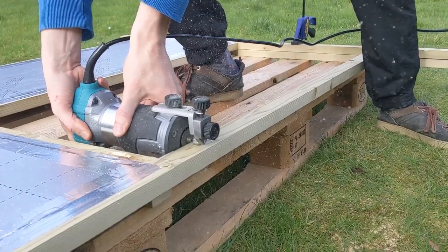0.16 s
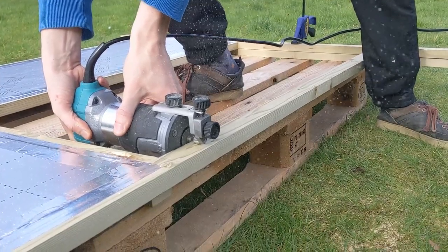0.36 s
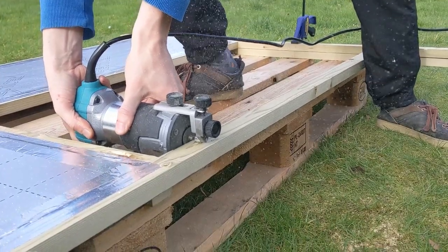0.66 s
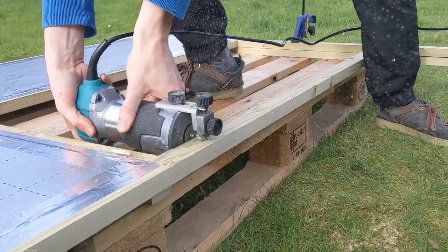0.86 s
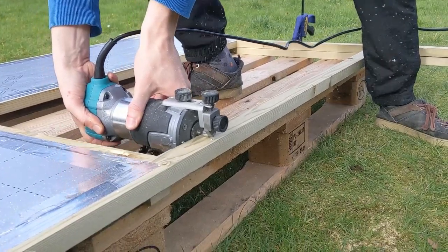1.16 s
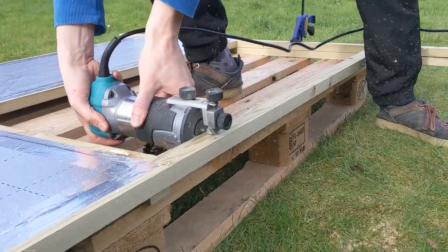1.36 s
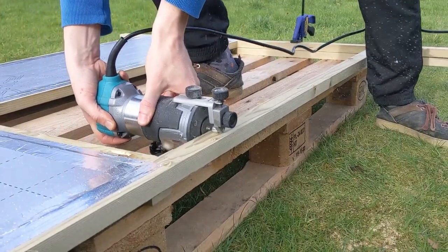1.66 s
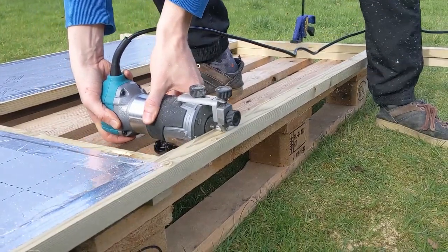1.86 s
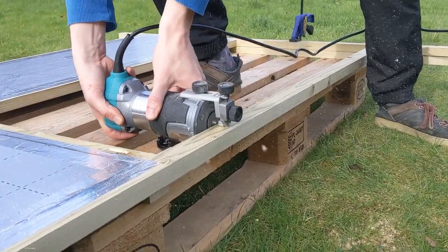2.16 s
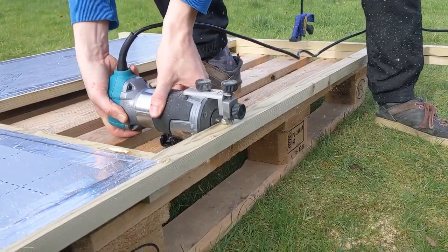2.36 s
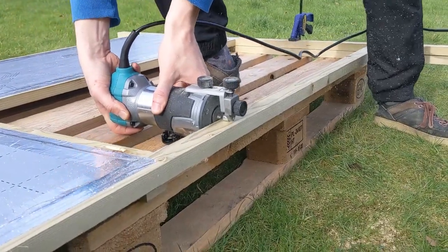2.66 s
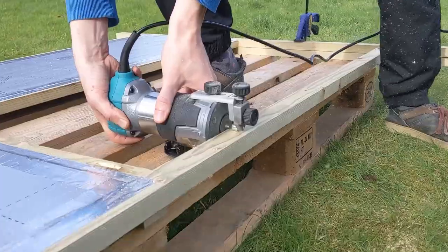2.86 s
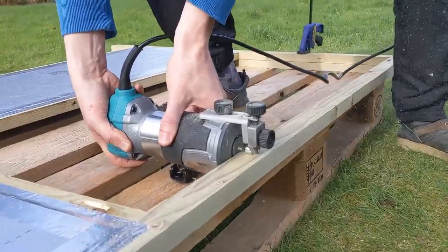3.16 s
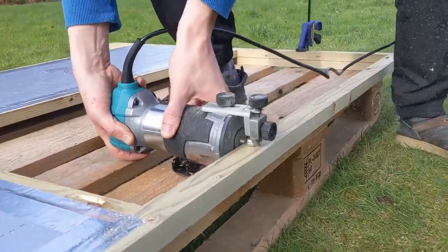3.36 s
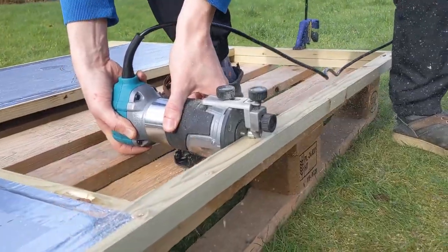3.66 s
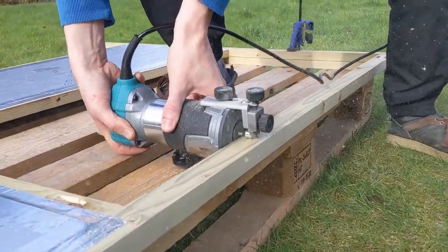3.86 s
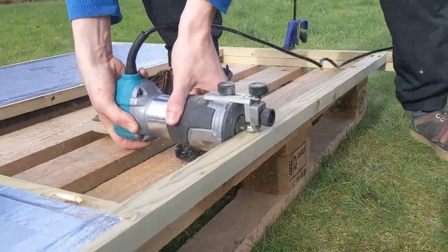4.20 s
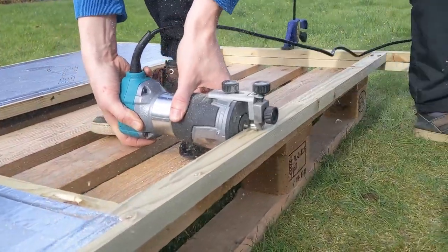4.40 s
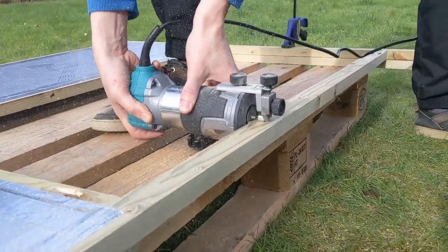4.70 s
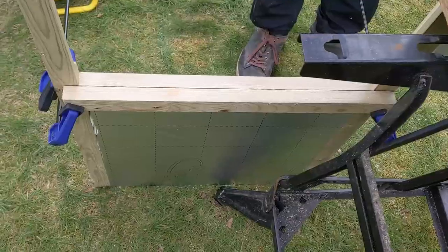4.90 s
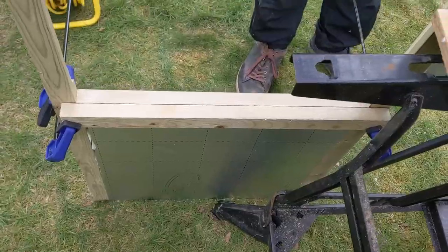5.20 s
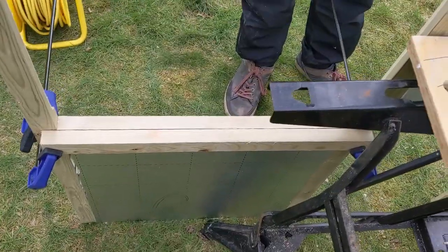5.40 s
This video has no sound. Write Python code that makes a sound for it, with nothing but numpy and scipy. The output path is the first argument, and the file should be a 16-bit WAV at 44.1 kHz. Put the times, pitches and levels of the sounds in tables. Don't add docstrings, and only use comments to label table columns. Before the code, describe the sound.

A handheld wood router, already at full speed, drones and whines close to a small stereo camera, with airy, chattering chip noise. Its stereo image and tone change abruptly just before one second, then individual harmonics flare and fade. Near the end the cutting roughens, then a hard edit leaves a quiet grassy place with low wind thumps, faint far traffic hiss, tiny clicks and one brief shoe scuff.

```python
import sys
import numpy as np
from scipy import signal
from scipy.fft import rfft, irfft
from scipy.io import wavfile

SR = 44100
rng = np.random.default_rng(int(sys.argv[2]) if len(sys.argv) > 2 else 0)


def volts_from_decibels(level):
    exponent = np.asarray(level, float) / 20
    return 10 ** exponent


def dump(signal):
    limited = np.clip(np.atleast_2d(signal).T, -1, 1)
    pcm = np.round(limited * 32767).astype(np.int16)
    wavfile.write(sys.argv[1], SR, pcm)


N = 244314
T = np.arange(N) / SR
HZ = np.maximum(np.fft.rfftfreq(N, 1 / SR), 1)

BALL_PASS, BALL_SIDEBAND = 4.575, 1.425
STRONG_ORDERS = (BALL_SIDEBAND, 3, 4, BALL_PASS, 5, 6, 7, *range(8, 40, 2))


def rms_one(x):
    return x / np.sqrt(np.mean(x ** 2) + 1e-20)


def in_time(rows):
    s, *columns = np.transpose(rows)
    return np.array([np.interp(T, s, column) for column in columns])


def at_hz(points):
    hz, value = np.array(points).T[:2]
    return np.interp(np.log(HZ), np.log(hz), value)


def step(at_s, fade_s):
    return np.clip((T - at_s) / max(fade_s, 1 / SR) + .5, 0, 1)


def panned(pan_db):
    return volts_from_decibels(np.array([pan_db / 2, -pan_db / 2]))


def filtered(x, order, hz, kind):
    return signal.sosfilt(signal.butter(order, hz, kind, fs=SR, output="sos"), x)


def bell(at_s, length_s, t=T):
    return np.exp(-4 * np.log(2) * ((t - at_s) / length_s) ** 2)


def swells(rows, resting_db):
    out = volts_from_decibels(resting_db) * np.ones((2, N))
    for s, length_s, *side_db in rows:
        near = slice(max(int((s - 2 * length_s) * SR), 0), int((s + 2 * length_s) * SR))
        out[:, near] += np.outer(volts_from_decibels(np.array(side_db)), bell(s, length_s, T[near]))
    return out


def drift(rate_hz, count):
    hop = 64
    settle = 1000
    pole = np.exp(-2 * np.pi * hop * rate_hz / SR)
    coarse = rng.standard_normal((count, N // hop + settle + 2))
    slow = signal.lfilter([1], [1, -2 * pole, pole * pole], coarse)[:, settle:]
    slow = slow / slow.std(axis=1, keepdims=True)
    return np.array([np.interp(np.arange(N) / hop, np.arange(len(row)), row) for row in slow])


def stereo_noise(spectrum_db, likeness, excite, lag_s=0):
    mid, side = rfft(excite)
    alike = np.clip(likeness, -1, 1)
    shared = np.sqrt(1 + alike) * mid
    opposed = np.sqrt(1 - alike) * side
    left = (shared + opposed) * np.exp(2j * np.pi * HZ * lag_s)
    right = shared - opposed
    return rms_one(irfft(volts_from_decibels(spectrum_db) * np.array([left, right]), N))


def patchy(x, shared_db, own_db):
    spectrum = rfft(x)
    together = drift(12.0, count=1)[0]
    own = drift(41, count=9)
    octave = np.clip(np.log2(HZ / 60), 0, 8)
    out = 0
    for k in range(9):
        band = irfft(spectrum * np.clip(1 - abs(octave - k), 0, 1), N)
        out = out + volts_from_decibels(shared_db * together + own_db * own[k]) * band
    return out


def tone(angle, level_db, lead, wander, rate_hz):
    a, b, c, d = drift(rate_hz, count=4)
    share = np.clip(wander, 0, 1)
    path = np.sqrt(1 - share) + np.sqrt(share / 2) * np.array([a + 1j * b, c + 1j * d])
    angle = angle + 2 * np.pi * rng.random()
    return np.sqrt(2) * volts_from_decibels(level_db) * np.real(path * np.exp(1j * np.array([angle + lead, angle])))


def roaming_tone(angle, swapped, per_turn, level_db, wander):
    first_lead = min(.25 * per_turn, 2.3)
    second_lead = .065 * per_turn * drift(1.6, count=1)[0]
    lead = (1 - swapped) * first_lead + swapped * second_lead
    return tone(per_turn * angle, level_db, lead, wander, rate_hz=8 + .22 * per_turn)


def by_pair(levels, swapped):
    return np.outer(levels[:2], 1 - swapped) + np.outer(levels[2:], swapped)


def far_traffic():
    # (time [s], level [dB], left-right [dB])
    hiss_course = [(4.78, -63.5, -4.5), (5.0, -67, -3.5), (5.1, -64, -2.5), (5.27, -68.5, -1),
                   (5.35, -64.5, 0), (5.54, -67.5, -0.5)]
    # (frequency [Hz], density [dB per Hz])
    hiss_colour = [(250, -0.5), (450, -7.5), (700, -7), (1000, -4.5), (1400, -10.5), (1900, -8),
                   (3000, -18), (5000, -25), (7000, -33), (11000, -26.5), (15800, -31)]
    level_db, pan_db = in_time(hiss_course)
    hiss = stereo_noise(at_hz(hiss_colour), -.1, rng.standard_normal((2, N)))
    hiss = patchy(hiss, shared_db=1.0, own_db=1.2)
    airy = filtered(hiss, 2, 4000, "high")
    return (volts_from_decibels(level_db + 9.0) * (hiss - airy) + volts_from_decibels(-57) * airy) * panned(pan_db)


def ticks():
    # (time [s], peak [dB], left-right [dB])
    tick_events = [
        (4.828, -67, 4),
        (5.12, -57, -9),
        (5.241, -54, -9),
    ]
    bright = filtered(rng.standard_normal(N), 2, 3800, "high")
    out = np.zeros((2, N))
    for s, peak_db, side_db in tick_events:
        decay = volts_from_decibels(peak_db - 60 * np.maximum(T - s, 0) / .012) * (T >= s)
        out += decay * bright * panned(side_db)[:, None]
    return out


def scuff():
    # (time [s], level [dB])
    scuff_course = [
        (5.15, -76),
        (5.16, -64),
        (5.2, -62),
        (5.21, -93),
    ]
    noise = filtered(rng.standard_normal((2, N)), 3, [2500, 5800], "band")
    return volts_from_decibels(in_time(scuff_course)[0]) * rms_one(noise) * panned(-2.7)[:, None]


def wind(changed):
    # (time [s], length [s], left [dB], right [dB])
    router_gusts = [
        (.5, 0.96, -59, -63),
        (1.0, 0.41, -64, -60.5),
        (1.8, 0.92, -73, -74),
        (3.2, .4, -80, -76),
        (4.05, 0.61, -76, -75),
        (4.74, 0.17, -66, -67),
    ]
    # (time [s], length [s], left [dB], right [dB])
    field_gusts = [
        (4.78, 0.037, -49.5, -65),
        (4.87, 0.018, -54, -51),
        (5.01, 0.041, -54, -44),
        (5.06, 0.048, -48, -60),
        (5.11, 0.042, -56, -44),
        (5.16, 0.038, -52, -60),
        (5.2, 0.023, -59, -32),
        (5.26, 0.036, -58, -32.5),
        (5.32, 0.054, -44, -40),
        (5.54, 0.019, -62, -45),
    ]
    # (frequency [Hz], density [dB per Hz])
    wind_colour = [(18, -8), (45, 0), (70, -6), (110, -15), (170, -21), (300, -33), (600, -58),
                   (2000, -100)]
    router_gain = swells(router_gusts, resting_db=-83.5)
    field_gain = swells(field_gusts, resting_db=np.array([[-50], [-49]]))
    lumps = volts_from_decibels(2.4 * drift(12, count=2))
    turbulence = stereo_noise(at_hz(wind_colour), .25, rng.standard_normal((2, N)))
    return ((1 - changed) * router_gain + changed * field_gain) * rms_one(lumps * turbulence)


def shaft_angle():
    # (time [s], speed [turns per s])
    speed = [(0, 412.3), (0.47, 415.4), (0.87, 409.1), (1.09, 393.5), (1.13, 393.5), (1.19, 401.8),
             (1.49, 397.4), (1.57, 400.3), (1.69, 399.1), (1.75, 401.4), (1.91, 398.3), (2.01, 403.6),
             (2.05, 403.6), (2.17, 402.9), (2.25, 398.4), (2.29, 398.4), (2.45, 400.2), (2.61, 405.7),
             (2.91, 405.7), (3.21, 394.3), (3.57, 394.6), (3.63, 391.8), (3.71, 391.9), (3.77, 396.7),
             (3.81, 396.7), (3.95, 394.5), (4.01, 391.6), (4.21, 392.3), (4.25, 396.7), (4.37, 400.3),
             (4.45, 395.4), (4.63, 394.8), (4.67, 391.6), (4.76, 390.7)]
    tremble = .25 * drift(25, count=1)[0] + .4 * drift(7, count=1)[0]
    return 2 * np.pi * np.cumsum(in_time(speed)[0] + tremble) / SR


def jolts():
    # (time [s], level [dB])
    jolt_events = [(1.1, -77), (1.83, -71), (3.47, -65.5), (3.77, -61.5), (3.95, -65), (4.05, -62.5),
                   (4.12, -68), (4.22, -63), (4.29, -70), (4.5, -67), (4.7, -78.5)]
    return swells([(s, 0.067, db, db) for s, db in jolt_events], resting_db=-77.5)


def catches():
    # (time [s], length [s], change [dB])
    catch_events = [(0.997, .12, 2.5), (1.46, 0.042, 0.5), (1.79, .05, -3), (1.998, .06, -1),
                    (2.63, 0.07, 0.5), (3.62, 0.045, 0.5), (3.92, 0.067, 1), (4.194, 0.063, 3.5),
                    (4.307, .05, -3.5), (4.347, 0.044, 3.5), (4.48, 0.045, -0.5), (4.53, .04, 3),
                    (4.63, 0.029, 8), (4.72, .08, 1)]
    return sum(db * bell(s, length_s) for s, length_s, db in catch_events)


def cutting_noise(angle, swapped):
    # (time [s], level [dB], left-right [dB])
    noise_course = [(0.0, -35, 1.5), (0.62, -34.5, 1), (0.82, -35.5, 1), (1.74, -37, 0.5), (3.11, -36, 0.5),
                    (3.35, -35, 1.5), (3.6, -36, 2), (4.44, -36, 1.5), (4.76, -35.5, 1.5)]
    # (frequency [Hz], density [dB per Hz])
    first_colour = [(60, -90), (120, -85.5), (300, -84.5), (480, -82), (620, -76), (850, -75), (1400, -83),
                    (1800, -77.5), (2400, -81.5), (3500, -75), (5300, -82.5), (7350, -93.5), (10500, -83.5),
                    (15500, -86)]
    second_colour = [(50, -104), (110, -90), (260, -92.5), (490, -91), (600, -77), (720, -77),
                     (1450, -82.5), (1900, -77), (2300, -80.5), (3600, -78.5), (5400, -85.5), (7300, -92.5),
                     (9800, -87), (15500, -88.5)]
    # (frequency [Hz], width [Hz], gain [dB])
    resonances = [
        (1675, 340, 8.5),
        (2094, 36, 6.5),
        (2712, 260, 8),
        (3144, 140, 4.5),
        (5110, 250, 4.5),
    ]
    # (frequency [Hz], correlation [-1 to 1])
    first_likeness = [(100, 1), (600, 0.75), (1000, 1), (2000, 0.91), (4500, 0.56), (10000, 0.073)]
    second_likeness = [(100, -0.87), (300, -0.6), (600, -0.13), (1000, -0.29), (3000, -0.16),
                       (10000, -0.13)]

    puffs = volts_from_decibels(1.2 * np.cos(angle) + 1.6 * np.cos(2 * angle + 1.2))
    chips = volts_from_decibels(2.0 * np.minimum(rng.exponential(1, (2, 2, N)), 4.5))
    excite = puffs * chips * rng.standard_normal((2, 2, N))
    body_db = sum(db / (1 + (2 * (HZ - hz) / width) ** 2) for hz, width, db in resonances)
    first = stereo_noise(at_hz(first_colour) + 1.44 * body_db, at_hz(first_likeness), excite[0], lag_s=4 / SR)
    second = stereo_noise(at_hz(second_colour) + body_db, at_hz(second_likeness), excite[1])
    both = volts_from_decibels(-1.6) * (1 - swapped) * first + volts_from_decibels(-2.5) * swapped * second
    both = patchy(both, shared_db=.7, own_db=1.7)

    treble = filtered(both, 4, 7000, "high")
    lower = filtered(both, 4, 7000, "low")
    rumble = filtered(both, 4, 330, "low")
    lower += (volts_from_decibels(-4 * swapped) + volts_from_decibels(71.5) * jolts() - 1) * rumble
    bite_db = 3 * bell(.87, .16)
    treble_db = 1.8 + bite_db + 0.48 * catches() + 1.3 * drift(29, count=1)[0]
    treble = treble * volts_from_decibels(treble_db) * panned(-2.5)[:, None]
    level_db, pan_db = in_time(noise_course)
    return volts_from_decibels(level_db) * (lower + treble) * panned(pan_db)


def order_gain(per_turn, swapped):
    # (first pair left [dB], first right [dB], second pair left [dB], second right [dB])
    resting = [(-66, -60, -73, -75.5), (-72, -58, -51, -52), (-46, -49.5, -54.5, -56),
               (-55, -48, -49, -52.5), (-67, -58, -60, -55), (-56.0, -61, -55.5, -71),
               (-69, -55.0, -64.5, -57), (-57, -59, -57.5, -55.5), (-66, -48, -59.5, -56),
               (-76.5, -55, -57, -56.5), (-57, -63.0, -58.5, -69), (-54, -50.5, -62, -65.5),
               (-61, -70, -66.5, -75), (-67.5, -63, -63.5, -68), (-61, -65, -59.5, -65.5),
               (-58, -69, -60, -64.5), (-59, -49.5, -58, -58.5), (-59.0, -59.0, -63, -61),
               (-63, -51, -64, -54), (-59, -60.5, -67, -56), (-64, -62.0, -70, -61), (-62, -61, -67, -54),
               (-76.5, -76.5, -74, -63)]
    # (time [s], order [per turn], length [s], left [dB], right [dB])
    order_flares = [(0.073, 3, 0.27, -51, -57), (0.307, 4, 0.1, -48, -47), (0.51, 3, 0.18, -68.0, -54),
                    (0.55, 4, 0.1, -46, -54), (0.79, 3, 0.46, -53.5, -79), (0.83, 4, 0.59, -56, -50.5),
                    (1.17, 1.425, 1, -61, -72.0), (1.372, 3, 0.4, -51, -48.0), (1.677, 4, 0.065, -52, -56),
                    (1.82, 3, 0.05, -53, -52), (1.91, 4, 0.25, -62, -69), (2.19, 3, 0.17, -54.0, -51),
                    (2.31, 4, 0.18, -51.5, -69), (2.73, 4, 1, -59.5, -59), (2.983, 4, 0.16, -42, -61.5),
                    (3.45, 3, 0.99, -59, -51), (3.593, 1.425, 0.83, -57, -67.5),
                    (3.695, 4, 0.047, -46.5, -76.5), (4.07, 3, 0.36, -49.5, -76.5),
                    (4.09, 4, 0.22, -47, -76.5), (4.696, 3, 0.14, -49, -76.5),
                    (4.717, 4, 0.19, -39.5, -76.5), (4.73, 1.425, 1, -51, -65),
                    (0.03, 8, 0.16, -58, -57), (0.13, 10, 0.36, -61, -58), (0.23, 6, 0.55, -49, -47.5),
                   (0.41, 8, 0.25, -58, -76.5), (0.53, 10, 0.29, -76.5, -51.5),
                   (0.774, 8, 0.31, -76.5, -50), (1.075, 6, 0.11, -46, -39), (1.252, 8, 0.1, -64, -54),
                   (1.48, 6, 0.52, -63, -46.5), (1.776, 8, 0.1, -53, -58), (2.07, 8, 0.19, -47, -65),
                   (2.232, 10, 0.84, -76.5, -53.5), (2.337, 6, 0.3, -66, -55), (2.71, 8, 0.43, -44.5, -54),
                   (3.04, 8, 0.055, -76.5, -51), (3.04, 10, 1, -60, -50), (3.27, 6, 0.53, -47.5, -76.5),
                   (3.7, 8, 0.089, -52, -42), (3.77, 8, 0.75, -47, -51.5), (3.907, 10, 0.44, -48, -76.5),
                   (3.98, 8, 0.21, -80, -46), (4.05, 6, 0.22, -50, -76.5), (4.357, 8, 0.1, -50.5, -66.5),
                   (4.67, 10, 0.49, -55, -66.0), (4.71, 6, 0.4, -76.5, -49.5),
                    (0.07, 22, 0.4, -53, -78), (0.17, 12, 0.9, -55, -67.5), (0.39, 24, 0.16, -54.5, -76.5),
                  (0.75, 20, 0.36, -51, -68.5), (0.81, 18, 0.6, -61.0, -67.5), (0.81, 24, 0.082, -53, -56),
                  (0.85, 16, 0.9, -66, -76.5), (0.85, 22, 0.23, -50, -57.0), (1.035, 24, 0.079, -44.5, -60),
                  (1.188, 14, 0.78, -50.5, -70), (1.81, 24, 0.93, -48, -52), (2.106, 22, 0.087, -61, -59),
                  (2.376, 24, 0.24, -49, -76.5), (2.45, 14, 0.53, -50.0, -68), (2.53, 12, 0.67, -67, -56.5),
                  (2.633, 22, 0.96, -51, -68), (2.91, 20, 0.2, -51.5, -76.5), (3.27, 18, 0.97, -75, -66.0),
                  (3.294, 24, 0.5, -46, -64), (3.51, 16, 1, -61, -78), (3.53, 12, 0.6, -62, -79),
                  (3.75, 22, 0.6, -61, -62), (3.853, 20, 0.21, -57, -59.0), (3.975, 14, 0.089, -52, -57),
                  (4.215, 14, 0.9, -47, -62), (4.27, 12, 0.77, -59, -53.5), (4.61, 12, 0.066, -56, -76.5),
                  (4.718, 18, 0.1, -76.5, -54.0),
                    (0.03, 5, 0.37, -53, -73.5), (0.51, 7, 0.4, -61, -65.5), (0.83, 4.575, 0.4, -47, -52),
                    (0.85, 5, 0.25, -47, -64.0), (1.03, 7, 0.06, -57.5, -55.0), (1.29, 5, 0.16, -52, -76.5),
                    (1.61, 5, 0.6, -66, -71.5), (1.857, 5, 0.092, -60, -48),
                    (2.047, 4.575, 0.084, -57.0, -50), (2.09, 7, 0.9, -76.5, -64.5),
                    (2.33, 4.575, 0.076, -46, -67.5), (2.97, 4.575, 0.9, -51, -50),
                    (3.09, 7, 0.9, -62, -76.5), (3.51, 5, 0.97, -54, -62.0), (3.872, 4.575, 0.1, -45, -53),
                    (4.135, 5, 0.06, -52.0, -51), (4.43, 4.575, 0.61, -51, -62),
                    (4.453, 7, 0.06, -54.0, -52.0), (4.513, 5, 0.25, -63, -49),
                    (4.59, 7, 0.9, -61.5, -55.5), (4.61, 4.575, 0.076, -48, -47),
                    (0.11, 38, 0.16, -61.5, -49.0), (0.233, 30, 0.25, -50.0, -51.0),
                  (0.367, 26, 0.06, -55.0, -55), (0.51, 34, 0.4, -75.0, -61), (0.71, 38, 0.25, -58.0, -47),
                  (0.85, 32, 0.4, -56, -52), (0.93, 28, 0.9, -61.5, -65.0), (0.936, 30, 0.06, -61.5, -42),
                  (1.01, 30, 0.28, -50, -59), (1.19, 26, 0.9, -53, -62), (1.45, 32, 0.055, -56.5, -54.0),
                  (1.45, 38, 0.25, -76.5, -57), (1.59, 34, 0.4, -61, -63), (1.79, 32, 0.6, -57.0, -76.5),
                  (2.39, 38, 0.1, -76.5, -49.5), (2.51, 38, 0.9, -61.0, -65.5), (2.57, 36, 0.71, -52, -70),
                  (2.59, 30, 0.6, -70, -64), (2.63, 34, 0.06, -76.5, -47.5), (2.83, 34, 0.9, -64, -54),
                  (2.85, 26, 0.81, -65, -56), (2.89, 28, 0.72, -63.5, -70.0), (2.93, 28, 0.06, -76.5, -46),
                  (3.85, 32, 0.9, -65, -61.0), (3.93, 34, 0.4, -72, -57.0), (3.99, 28, 1, -80, -60),
                  (4.09, 26, 0.21, -65, -63), (4.09, 36, 0.9, -68.5, -63.5), (4.175, 28, 0.051, -55.0, -47),
                  (4.17, 36, 0.06, -78, -50.5), (4.23, 30, 0.4, -67, -66), (4.61, 34, 0.16, -60.5, -56)]
    flares = np.array(order_flares)
    k = STRONG_ORDERS.index(per_turn)
    owner = abs(flares[:, 1:2] - STRONG_ORDERS).argmin(axis=1)
    own_flares = flares[owner == k][:, [0, 2, 3, 4]]
    return swells(own_flares, by_pair(resting[k], swapped))


def faint_orders(angle, swapped):
    orders = (2.575, 5.575, 7.575, 9, 11, 13, 29, 40, 4.08, 5.07, 6.07, 6.93)
    # (first pair left [dB], first right [dB], second pair left [dB], second right [dB])
    lone_levels = [(-62, -63, -61, -68), (-66, -62, -59, -57), (-50, -64, -60, -61), (-59, -66, -58, -58),
                   (-58, -62, -60, -72), (-68, -62, -57, -61), (-59, -58, -67, -64)]
    top_and_side_levels = [(-80, -80, -72, -51), (-53, -71, -62.5, -57.5), (-78, -66, -65, -57),
                           (-55, -54, -75, -90), (-66, -57, -55.5, -63)]
    out = np.zeros((2, N))
    for per_turn, levels in zip(orders[:8], lone_levels + top_and_side_levels[:1]):
        out += roaming_tone(angle, swapped, per_turn, by_pair(levels, swapped) + 0.5, wander=0.97)
    for per_turn, levels in zip(orders[8:], top_and_side_levels[1:]):
        out += roaming_tone(angle, swapped, per_turn, by_pair(levels, swapped) + 3.5, wander=.25)
    for per_turn in (*range(21, 28, 2), *range(31, 40, 2)):
        out += roaming_tone(angle, swapped, per_turn, level_db=-66, wander=.9)
    return out


def upper_orders(angle, swapped):
    chatter_db = 1.3 * drift(23.0, count=1)[0] + catches()
    out = np.zeros((2, N))
    for per_turn in STRONG_ORDERS:
        if per_turn in (BALL_SIDEBAND, 3, BALL_PASS):
            continue
        level_db = (chatter_db + 1.3) * (per_turn > 15)
        wander = .005 * per_turn + .6 / per_turn
        out += order_gain(per_turn, swapped) * roaming_tone(angle, swapped, per_turn, level_db, wander)
    return out


def third_order_and_bearings(angle, swapped):
    # (time [s], left lead [rad])
    lead_course = [(0, -1), (.9, 1.5), (1.4, 1), (1.85, -3), (2.15, -1.5), (2.7, 0.44), (3.3, 2), (3.9, 1),
                   (4.4, -2)]
    lead = in_time(lead_course)[0]
    out = order_gain(3, swapped) * tone(3 * angle, 0, lead, wander=0.2, rate_hz=10.3)
    out += order_gain(BALL_PASS, swapped) * tone(BALL_PASS * angle, 0, lead, wander=.3, rate_hz=18)
    sideband = tone(BALL_SIDEBAND * angle, 0, .3, wander=.35, rate_hz=14)
    out += order_gain(BALL_SIDEBAND, swapped) * sideband
    cage = tone(.74 * angle, np.array([[2.5], [-2.5]]), 0.8, wander=0.97, rate_hz=25.0)
    return out + jolts() * cage


def cutter_edges(angle):
    # (time [s], left [dB], right [dB], left lead [rad])
    edge_course = [(.08, -47.5, -40.5, 0.9), (.3, -44.5, -50.5, 1.34), (.8, -49, -41.5, -0.4),
                   (.95, -56, -42, -2), (1.2, -54.5, -48, -1.5), (1.6, -52, -47, -2),
                   (2.2, -46.5, -51.5, -1.66), (2.55, -43.5, -65, 2.5), (2.9, -44, -46.5, .5),
                   (3.45, -40.5, -60, 0), (4.0, -42, -53, -2.6), (4.18, -40, -45, -1),
                   (4.225, -49, -54, -0.5), (4.275, -35, -43, -1.5), (4.33, -44, -50, 0.5),
                   (4.4, -36, -42.5, -0.5), (4.68, -37.5, -42.5, 1), (4.76, -43, -45, 2.5)]
    left_db, right_db, lead = in_time(edge_course)
    return tone(2 * angle, np.array([left_db, right_db]), lead, wander=0.13, rate_hz=12)


def unbalance(angle, swapped):
    # (time [s], left [dB], right [dB])
    hum_course = [(0, -38, -39), (.8, -38, -38.5), (1.0, -41, -42.5), (1.7, -42, -44.5), (2.4, -42, -43.5),
                  (2.75, -39, -39.5), (3.1, -40.5, -43.5), (4.1, -38, -43.5), (4.76, -43.5, -46.5)]
    left = (1 - swapped) * np.cos(angle + 0.31) - swapped * np.cos(angle + 0.23)
    level_db = in_time(hum_course) + 0.053 * drift(3.4, count=2)
    return np.sqrt(2) * volts_from_decibels(level_db) * np.array([left, np.cos(angle)])


def router(swapped):
    angle = shaft_angle()
    out = unbalance(angle, swapped) + cutter_edges(angle)
    out += third_order_and_bearings(angle, swapped)
    out += upper_orders(angle, swapped) + faint_orders(angle, swapped)
    return out + cutting_noise(angle, swapped)


def scene():
    swapped = step(at_s=.868, fade_s=0.0047)
    changed = step(at_s=4.766, fade_s=0.00043)
    field = far_traffic() + ticks() + scuff()
    return (1 - changed) * router(swapped) + changed * field + wind(changed)


def top_cut(x):
    return signal.sosfilt(signal.butter(12, 15740, fs=SR, output="sos"), x)


def record(dry):
    low_pass = signal.ellip(10, .3, 70, 15720, fs=SR, output="sos")
    limited = signal.sosfilt(low_pass, dry)
    return top_cut(limited)


dry = scene()
out = record(dry)
dump(out)
```